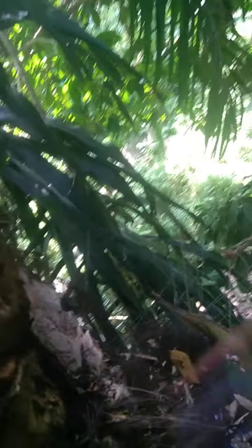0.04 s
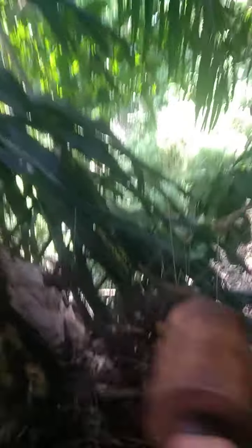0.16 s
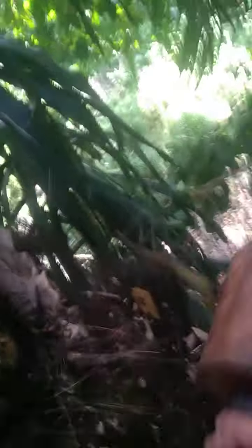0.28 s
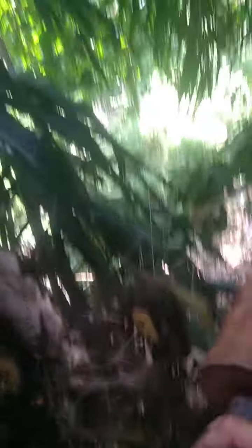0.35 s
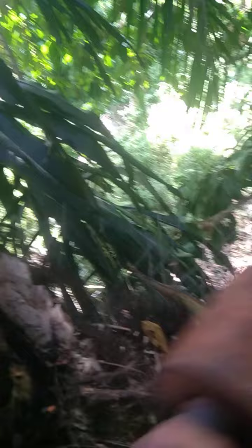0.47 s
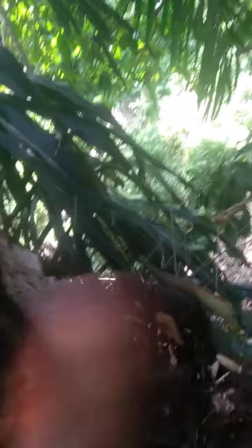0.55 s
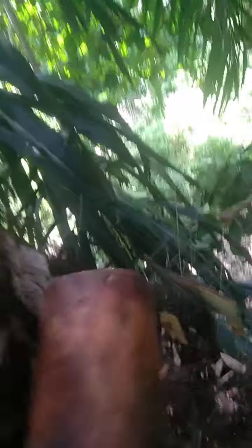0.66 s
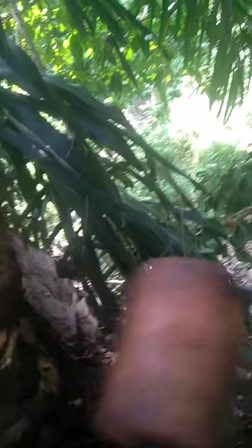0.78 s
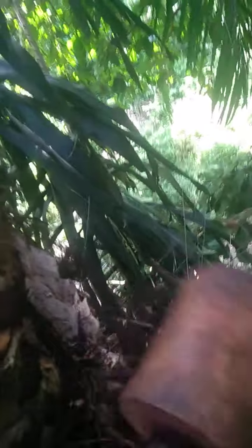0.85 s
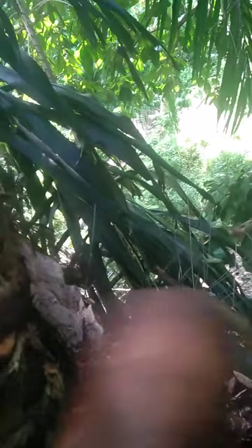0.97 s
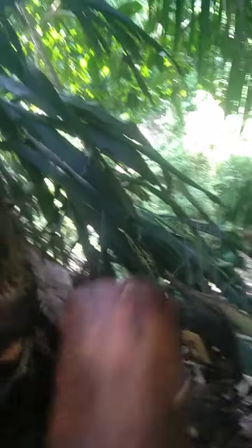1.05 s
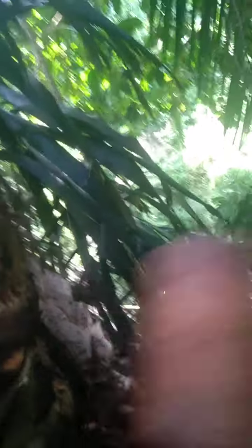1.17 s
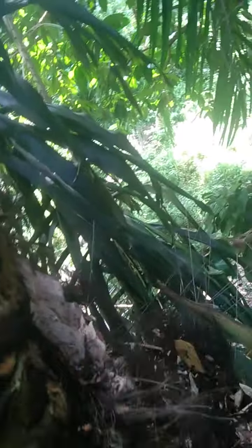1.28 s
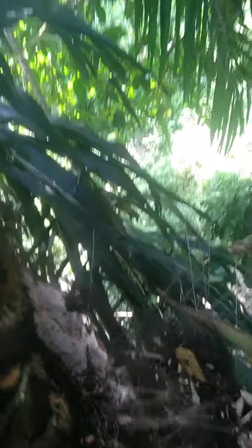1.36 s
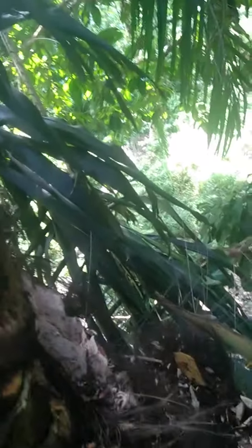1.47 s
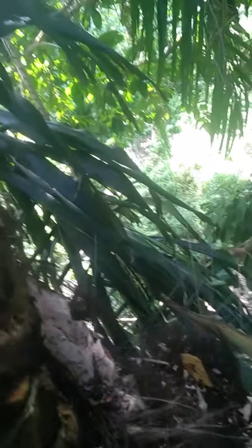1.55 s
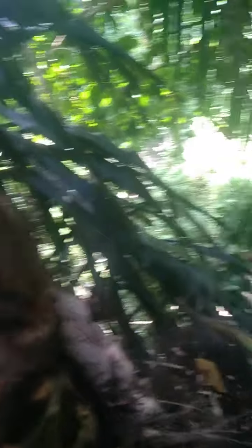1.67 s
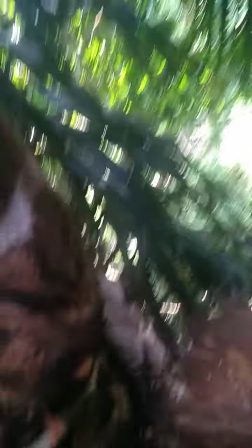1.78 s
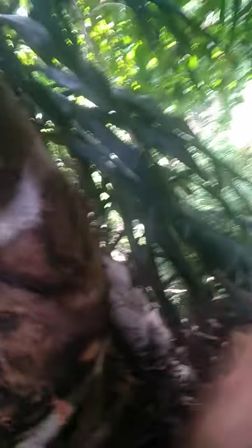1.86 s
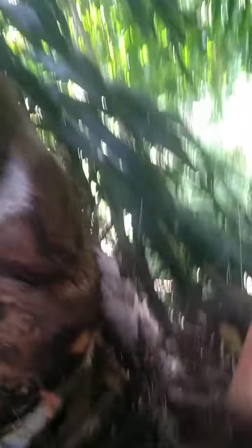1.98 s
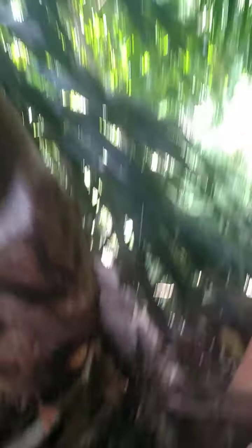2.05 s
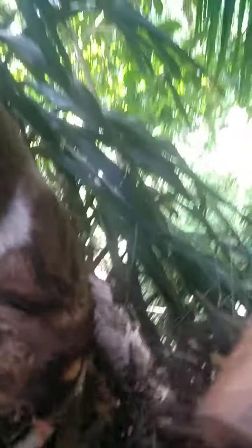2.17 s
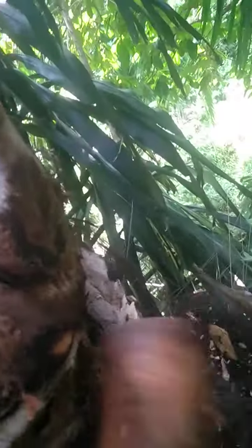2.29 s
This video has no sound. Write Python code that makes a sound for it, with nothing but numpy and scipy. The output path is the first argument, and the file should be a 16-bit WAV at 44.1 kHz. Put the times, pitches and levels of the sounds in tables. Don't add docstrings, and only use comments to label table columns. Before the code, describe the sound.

A wooden mallet strikes a palm stalk very close to a phone microphone. A hard, cracking, clipped blow at 0.2 s scatters a short echo among trunks and ducks the background; softer, hollow knocks follow at 0.7 and 1.1 s; another hard overloaded blow lands at 1.9 s. Shrill insects drone throughout over low forest murmur, with handling bumps, leaf rustle, faint whistles and a rising buzzing call near 1.7 s.

```python
import sys
import numpy as np
from scipy import signal
from scipy.fft import rfft, irfft
from scipy.io import wavfile
from scipy.ndimage import uniform_filter1d

SR = 44100
rng = np.random.default_rng(int(sys.argv[2]) if len(sys.argv) > 2 else 0)


def voltage_ratio(level):
    return 10 ** (np.asarray(level, float) / 20)


def to_wav(s):
    ch = np.atleast_2d(s).T
    pcm = np.round(np.clip(ch, -1, 1) * 32767)
    wavfile.write(sys.argv[1], SR, pcm.astype(np.int16))


N = 101430

# start in seconds, force in dB, hardness 0-1, echo level in dB, gain dip in dB.
BLOWS = [
    (0.2098, 22.5, 0.93, -1.5, -13.5),
    (0.7036, 5, 0.6, -21, -0.5),
    (1.1308, 1.5, 0.58, -20, -2),
    (1.9448, 18, 0.96, -2.5, -13),
]
DENSE_S = [.053, .028, .034, .053]
# frequency in Hz, level in dB for a soft blow, level in dB for a hard blow, T60 in seconds.
STALK_MODES = [(110, -35.5, -12, 0.0454), (189, -20.5, -9, 0.061), (281, 14, -14, 0.061),
               (393, -8.5, -7, 0.094), (521.1, 9, 3, 0.048), (648.5, -8.5, -3.5, 0.05),
               (843, -50.5, 4, 0.014), (1043, -16, -3, 0.044), (1231, -21.5, -7, 0.048),
               (1113.2, -4.5, -1.5, 0.048), (1385, -41.5, -7, 0.12), (1678, -49, -11.5, .025),
               (2357, -45, -5.5, 0.01), (3874, -57.5, -3.5, 0.013), ]
# frequency in Hz, gain in dB.
ECHO_SOFT_DB = [(47, -44), (80, -5.5), (258, 11), (501, 0.5), (1190, -19.5), (1610, -38.5), (3500, -48.5),
                (4550, -90), (7700, -120)]
ECHO_HARD_DB = [(47, -61), (80, -22), (332, -6.5), (587, -8), (1060, -3), (1380, -6), (2970, -35.5),
                (6530, -26), (15000, -82)]
# frequency in Hz, T60 in seconds.
WOOD_T60_S = [(100, 0.17), (300, 0.75), (1000, 0.45), (2500, 0.35), (6000, 0.22), (12000, .4)]
# start in seconds, level in dB, frequency in Hz, length in cycles.
BUMPS = [(.035, -33, 4160, 2.1), (0.086, -41.5, 530, 6), (0.141, -34, 1120, 1.9), (0.101, -44.5, 78, 4.6),
         (0.192, -21, 62, 2), (0.302, -24, 84, 1.5), (0.349, -14, 98, 1.14), (0.816, -36, 1976, 2.5),
         (1.013, -29.5, 448, 2.36), (1.36, -25.5, 4560, 4.1), (1.363, -38.5, 2750, 2.4),
         (1.926, -38, 118, 3.3), (1.96, -24, 50.6, 2.2), (2.038, -19, 110, 1.2)]
# start in seconds, length in seconds.
LEAVES = [(.01, .04), (.155, .06), (.23, .13), (.86, .06), (.97, .03), (1.36, .12), (1.96, .13)]
LEAF_DB = [-54.5, -62.5, -48, -61, -85, -59.5, -51.5]
# start and length in seconds, start, end and band width in Hz.
BUZZES = [
    (1.71, .18, 5100, 6300, 900),
    (1.885, .065, 4600, 5600, 350),
    (1.71, .17, 5000, 5500, 800),
    (.74, .85, 3400, 3100, 1400),
    (1.98, .31, 5200, 4800, 900),
]
BUZZ_DB = [-44.5, -43, -49.5, -67, -54.5]
# start and length in seconds, start and end frequency in Hz.
WHISTLES = [(.83, .24, 2080, 2300), (.9, .14, 1800, 2050), (1.19, .13, 2120, 2130), (1.5, .03, 2120, 2120),
            (.92, .13, 2950, 2980), (.8, .25, 3400, 3300)]
WHISTLE_DB = [-61.5, -65, -56.5, -60.5, -62, -80]
# centre in Hz, width in Hz, level in dB rms, clicks per second.
INSECTS = [(7097, 890, -38.5, 500), (6859, 1000, -40, 560), (4530, 330, -61, 2700),
           (14320, 1300, -58, 4800), (10320, 950, -73.5, 3300), (9180, 560, -85.5, 2960)]
# frequency in Hz, density in dB per Hz.
AIR_SPECTRUM = [(24, -50.5), (40, -23.5), (157, -3.5), (205, -13), (358, -12), (600, -27.5), (738, -19),
                (3140, -31.5), (5600, -23), (7280, -52.5), (12300, -120)]
# frequency in Hz, margin to the usual level in dB.
GATE_DB = [(1300, -30), (2200, -8), (4200, -8), (4700, -9.5), (5800, -9), (6300, -30), (7700, -30),
           (8300, -6), (11500, -4), (14000, -6)]

CONTACT_S, LIFT_DB, RISE_S = 0.0102, -13, 0.0015
BOUNCE_S, BOUNCE_DB = 0.0072, -6
TICK_DB, TICK_S, TICK_HZ, TICK_WIDTH_HZ = -20.5, 0.0032, 5180, 3000
STEP_DB, STEP_TOP_HZ, TREBLE_DB = -11.5, 2320, -4
LATE_DB, LATE_SLOWER = -30.5, 9
BASS_HZ, BASS_HOLD = 750, 0.22
AIR_DB = -51.5
DIP_S, DIP_HOLD_S, RECOVER_DB_PER_S = 0.006, 0.2, 16.5
CEILING, CEILING_SAG = 0.66, 0.3
MIC_BOTTOM_HZ, MIC_TOP_HZ = 60, 8600


def evened(x):
    return x / np.sqrt(np.mean(x ** 2) + 1e-20)


def read(points, hz):
    f, value = np.transpose(points)
    return np.interp(np.log(hz + 1), np.log(f + 1), value)


def add(mix, start_s, sound):
    part = mix[round(start_s * SR):][:len(sound)]
    part += sound[:len(part)]


def resonate(x, hz, width_hz):
    turn = np.exp(2j * np.pi * np.cumsum(hz * np.ones(len(x))) / SR)
    r = np.exp(-np.pi * width_hz / SR)
    smooth = signal.lfilter([(1 - r) ** 2], [1, -2 * r, r * r], x / turn)
    return 2 * (turn * smooth).real


def coloured(x, gain_db):
    return irfft(rfft(x) * voltage_ratio(gain_db(np.fft.rfftfreq(len(x), 1 / SR))), len(x))


def tick(hard, t):
    noise = rng.standard_normal(len(t))
    for _ in range(2):
        noise = resonate(noise, TICK_HZ, TICK_WIDTH_HZ)
    return voltage_ratio(TICK_DB - 6 * hard) * np.exp(-t / TICK_S) * np.minimum(t * 3000, 1) * evened(noise)


def knock(hard):
    t = np.arange(6000) / SR
    ring = np.zeros(len(t))
    for hz, soft_db, hard_db, t60_s in STALK_MODES:
        mode_db = soft_db + (hard_db - soft_db) * hard - 60 * t / t60_s
        ring -= voltage_ratio(mode_db) * np.sin(2 * np.pi * hz * t)
    ring = ring * np.minimum(t / RISE_S, 1) / 2
    out = ring + tick(hard, t)
    dull_ring = signal.lfilter([0.12], [1, -0.88], ring)
    add(out, BOUNCE_S, voltage_ratio(BOUNCE_DB) * dull_ring)
    return out * voltage_ratio(LIFT_DB * np.clip((t - CONTACT_S) * 500, 0, 1))


def echoes(hard, dense_s, echo_db):
    patches = voltage_ratio(rng.standard_normal(SR // 100 + 1)).repeat(100)[:SR]
    taps = rng.standard_normal(SR) * patches
    taps = evened(coloured(taps, lambda hz: read(ECHO_HARD_DB, hz) * hard + read(ECHO_SOFT_DB, hz) * (1 - hard)))

    hz, t, z = signal.stft(taps, SR, nperseg=256)
    hold_s = dense_s * np.where(hz < BASS_HZ, 1 - hard * (1 - BASS_HOLD), 1)[:, None]
    fall_db = -60 * np.maximum(t - hold_s, 0) / read(WOOD_T60_S, hz)[:, None]
    decay = voltage_ratio(fall_db) + voltage_ratio(LATE_DB + fall_db / LATE_SLOWER)
    tail = signal.istft(z * decay, SR, nperseg=256)[1][:SR]

    t = np.arange(SR) / SR
    low = signal.filtfilt(*signal.butter(3, STEP_TOP_HZ, fs=SR), tail)
    stepped = low * voltage_ratio(STEP_DB * np.clip((t - dense_s) * 500, 0, 1)) + (tail - low) * voltage_ratio(TREBLE_DB)
    fade_in = np.clip((t - 0.006) / 0.0076, 0, 1)
    fade_out = np.minimum((1 - t) / 0.33, 1)
    return stepped * voltage_ratio(echo_db) * fade_in * fade_out


def bump(db, hz, cycles):
    t = np.arange(0, 2.5 * cycles / hz, 1 / SR)
    swell = np.sin(np.pi * (t / t[-1]) ** 0.2) ** 2
    return voltage_ratio(db) * np.sin(2 * np.pi * hz * t) * swell


def slide(length_s, db, start_hz, end_hz, width_hz, bend):
    u = np.linspace(0, 1, round(length_s * SR))
    hz = start_hz + (end_hz - start_hz) * u ** bend
    tone = resonate(rng.standard_normal(len(u)), hz, width_hz)
    return voltage_ratio(db) * evened(tone) * np.sin(np.pi * u ** 0.7) ** 0.5


def leaf_rustle(length_s, db):
    return slide(length_s, db, 10000, 10500, width_hz=13000, bend=0.57)


def buzz(length_s, db, start_hz, end_hz, width_hz):
    return slide(length_s, db, start_hz, end_hz, width_hz, bend=0.5)


def whistle(length_s, db, start_hz, end_hz):
    return slide(length_s, db, start_hz, end_hz, width_hz=70, bend=0.9)


def insects():
    out = np.zeros(N)
    for hz, width_hz, db, clicks_per_s in INSECTS:
        clicks = (rng.random(N) < clicks_per_s / SR) * rng.standard_normal(N)
        clicks = clicks + 0.36 * rng.standard_normal(N)
        swell = evened(np.interp(np.arange(N), np.linspace(0, N, 24), rng.standard_normal(24)))
        song = resonate(resonate(clicks, hz, 2 * width_hz), hz, width_hz)
        out += voltage_ratio(db + 1.57 * swell) * evened(song)
    return out


def air():
    real, imag, patches = rng.standard_normal((N // 256 + 5, 513, 3)).T
    patches = evened(uniform_filter1d(uniform_filter1d(patches, 8, 0), 12, 1))
    hz = np.fft.rfftfreq(1024, 1 / SR)
    spectrum_db = read(AIR_SPECTRUM, hz) - 40 * (hz > 6000)
    z = (real + 1j * imag) * voltage_ratio(spectrum_db)[:, None] * voltage_ratio(2 * patches)
    return voltage_ratio(AIR_DB) * evened(signal.istft(z, nperseg=1024, noverlap=768)[1][:N])


def scene():
    mix = insects() + air()
    for (start_s, force_db, hard, echo_db, _), dense_s in zip(BLOWS, DENSE_S):
        add(mix, start_s, voltage_ratio(force_db) * knock(hard))
        add(mix, start_s, echoes(hard, dense_s, echo_db))
    for start_s, db, hz, cycles in BUMPS:
        add(mix, start_s, bump(db, hz, cycles))
    for (start_s, length_s), db in zip(LEAVES, LEAF_DB):
        add(mix, start_s, leaf_rustle(length_s, db))
    for (start_s, length_s, *band_hz), db in zip(BUZZES, BUZZ_DB):
        add(mix, start_s, buzz(length_s, db, *band_hz))
    for (start_s, length_s, *ends_hz), db in zip(WHISTLES, WHISTLE_DB):
        add(mix, start_s, whistle(length_s, db, *ends_hz))
    return mix[None]


def gain_dips_db():
    total_db = np.zeros(N)
    for start_s, *_, dip_db in BLOWS:
        t = np.maximum(np.arange(N) / SR - start_s, 0)
        fall_db = dip_db * (1 - np.exp(-t / DIP_S))
        recovery_db = RECOVER_DB_PER_S * np.maximum(t - DIP_HOLD_S, 0)
        total_db += np.minimum(fall_db + recovery_db, 0)
    return total_db


def overload(x, dip_db):
    recent_db = uniform_filter1d(dip_db, size=9000, origin=4499)
    top = CEILING * voltage_ratio(CEILING_SAG * (dip_db - recent_db))
    return top * np.tanh((abs(x) / top) ** 4) ** (1 / 4) * np.sign(x)


def noise_gate(x):
    hz, t, z = signal.stft(x, SR, nperseg=512, noverlap=384)
    power = uniform_filter1d(uniform_filter1d(abs(z) ** 2, size=9, axis=0), size=15, axis=1)
    level_db = 10 * np.log10(abs(power) + 1e-16)
    usual_db = np.percentile(level_db, 65, axis=1)[:, None]
    above_db = level_db - usual_db - read(GATE_DB, hz)[:, None]
    gain = voltage_ratio(np.clip(10 * above_db, -40, 0))
    return signal.istft(z * gain, SR, nperseg=512, noverlap=384)[1][:N]


def roll_off(x):
    return signal.sosfilt(signal.butter(12, 16270, fs=SR, output="sos"), x)


def record(dry):
    dip_db = gain_dips_db()
    x = overload(dry[0] * voltage_ratio(dip_db), dip_db)
    x = signal.lfilter(*signal.butter(1, MIC_TOP_HZ, fs=SR), x)
    x = signal.sosfilt(signal.butter(3, MIC_BOTTOM_HZ, "high", fs=SR, output="sos"), x)
    return roll_off(noise_gate(x)[None])


dry = scene()
out = record(dry)
to_wav(out)
```